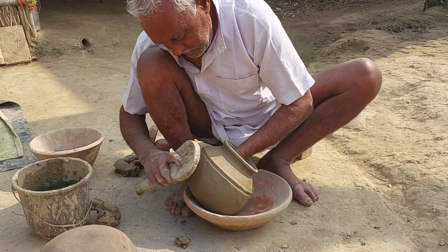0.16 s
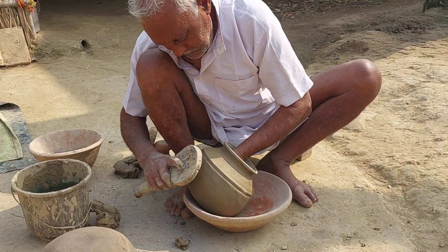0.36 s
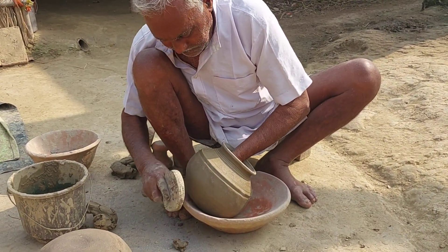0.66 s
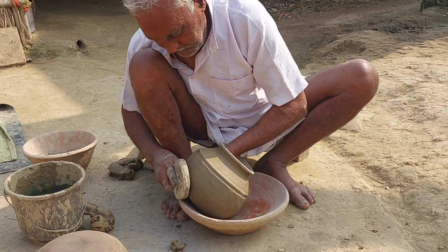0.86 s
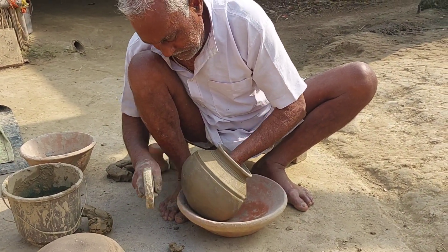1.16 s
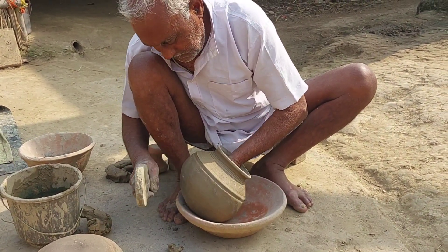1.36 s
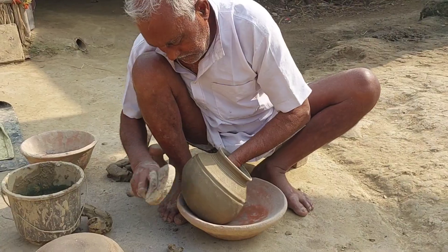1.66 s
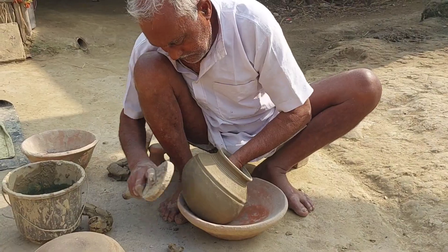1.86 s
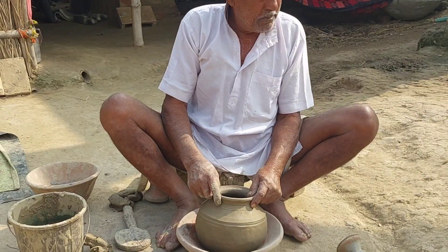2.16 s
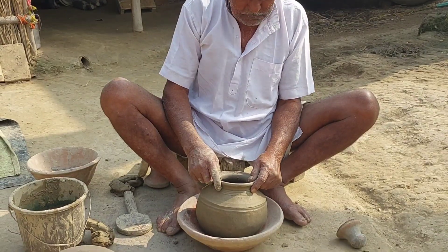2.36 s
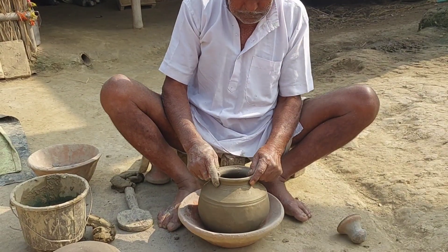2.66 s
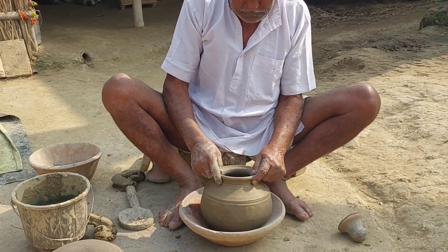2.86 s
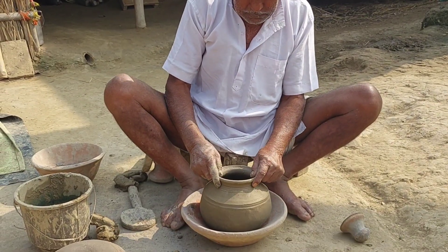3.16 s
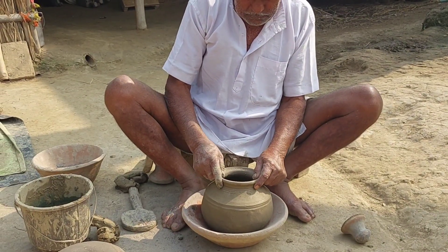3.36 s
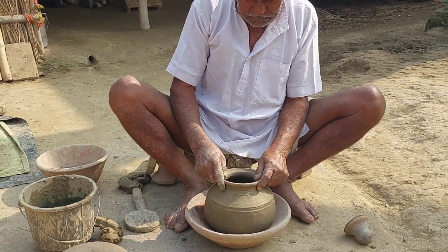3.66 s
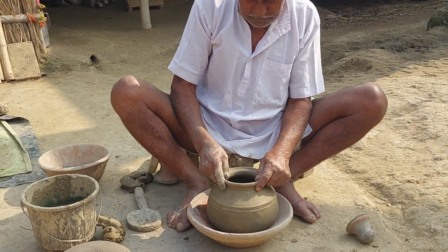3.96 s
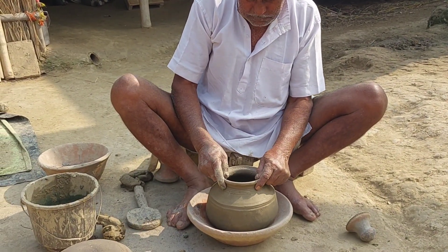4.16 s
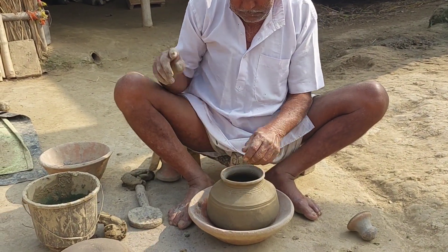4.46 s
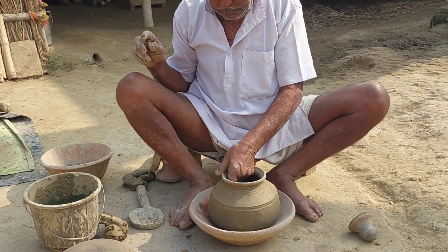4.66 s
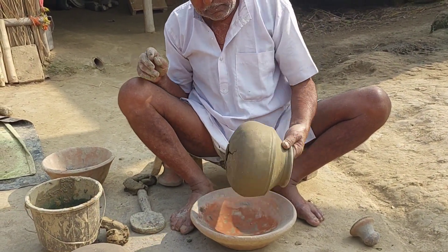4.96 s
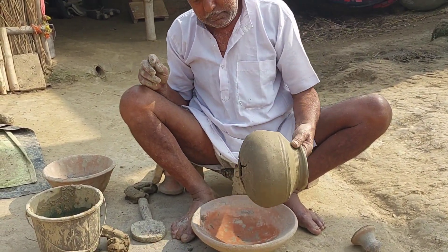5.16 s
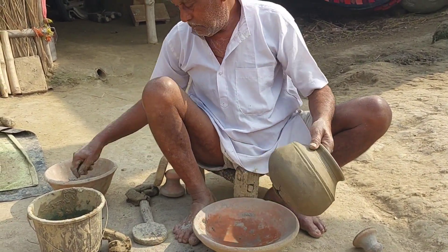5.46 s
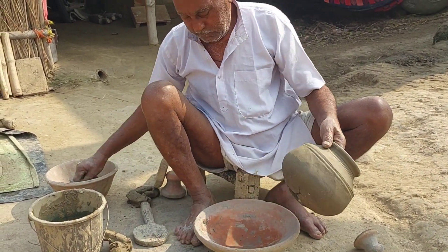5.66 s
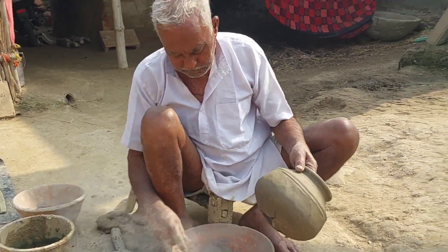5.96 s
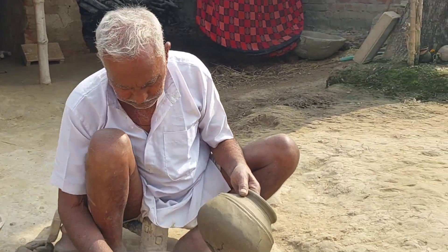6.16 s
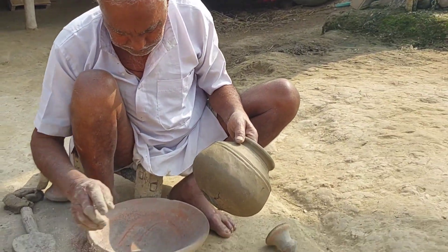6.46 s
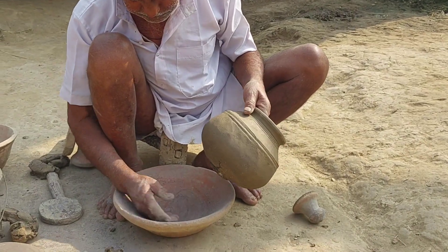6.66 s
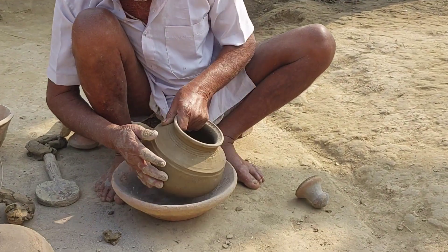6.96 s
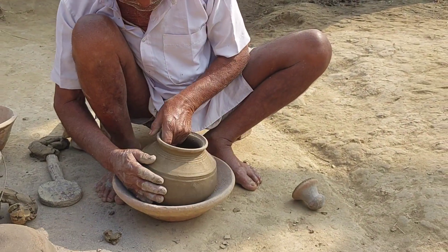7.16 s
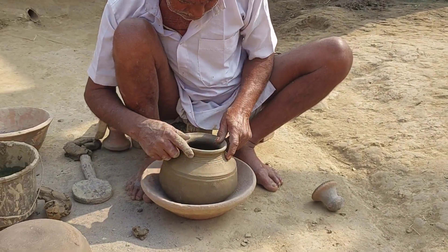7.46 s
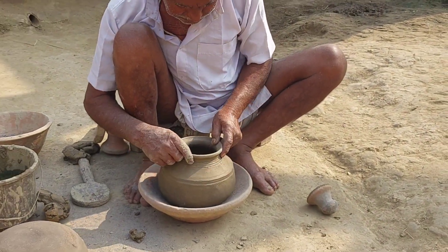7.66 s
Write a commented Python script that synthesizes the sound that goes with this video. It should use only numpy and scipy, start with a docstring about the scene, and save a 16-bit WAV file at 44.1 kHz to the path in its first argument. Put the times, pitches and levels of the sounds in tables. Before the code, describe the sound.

A wooden paddle beats a damp clay pot about five times a second, each blow a hollow thump with a sharp slap. Five blows come in the first 0.8 seconds, the last ones weakening; after a short pause, four louder ones follow from 1.2 to 1.8 seconds. From 2 to about 5 seconds it is much quieter: fingers give short gritty rubs and soft pats on the rim, while a very faint hum comes and goes. From 6 to 6.7 seconds a hand sweeps grit round a fired bowl, which rings lightly. At 7 seconds the pot slides into the bowl with a brief wavering squeal, then is dragged round with a grinding rumble, strongest at about 7.6 seconds. Light wind on the microphone, an airy rustle and faint distant chirps lie underneath. The place is an open earth yard, heard from a couple of metres away.

```python
"""An earth yard, a phone's two microphones a couple of metres from a squatting potter. Light wind, an
airy rustle and far chirps lie underneath. For two seconds a wooden paddle beats a damp clay pot, whose
soft wall and enclosed air thump together, with dull low tails. Then fingers work the rim, with soft
pats, while a faint hum comes and goes. At six seconds a hand sweeps grit round a fired bowl and makes
it ring; at seven the pot is set down in it with a squeal and dragged round."""
import sys
import numpy as np
from scipy import signal
from scipy.fft import rfft, irfft
from scipy.io import wavfile
from scipy.ndimage import uniform_filter1d

SR = 44100
rng = np.random.default_rng(int(sys.argv[2]) if len(sys.argv) > 2 else 0)


def master_out(mix):
    """Clip the mix to full scale and print it as 16-bit PCM to the path in sys.argv[1]."""
    frames = np.transpose(np.atleast_2d(mix))
    ceiling = np.clip(frames, -1, 1)
    pcm = np.round(ceiling * 32767).astype(np.int16)
    wavfile.write(sys.argv[1], SR, pcm)


N = 344421
T = np.arange(N) / SR

# wind on the microphones: (time [s], level [dB])
WIND_LEVELS = [(0.0, -58.5), (0.6, -68.5), (0.87, -54), (1.05, -76.5), (1.37, -58.5), (1.7, -63),
               (2.4, -62.5), (3.8, -64.5), (4.3, -62.5), (5.9, -64), (6.3, -59.5), (6.7, -63.5),
               (7.07, -58), (7.66, -47), (7.81, -57)]
# the background; the murmur's peaks are the dull tails of blows and ground bumps, and the pot's drag:
# (time [s], rustle level [dB], murmur level [dB])
BACKGROUND_LEVELS = [(0.0, -66, -48.5), (0.15, -68.5, -73.5), (0.95, -71, -72.5), (1.13, -74.5, -80.5),
                     (1.3, -67.5, -56), (1.39, -74, -89), (1.47, -68, -62.5), (1.6, -73.5, -69),
                     (1.82, -61, -59.5), (1.98, -70.5, -70), (2.8, -67, -72.5), (3.35, -69.5, -68),
                     (4.3, -64, -71), (5.0, -67, -71), (5.9, -69.5, -72.5), (6.15, -58.5, -63.5),
                     (6.45, -70.5, -73), (6.96, -72, -71.5), (7.25, -67, -53), (7.81, -72, -65.5)]
# spectra of the wind and the background: (frequency [Hz], relative density [dB])
WIND_SPECTRUM = [(12, -44), (20, -16.5), (70, -0.5), (85, -1), (102, -9.5), (129, -8.5), (170, -18.5),
                 (220, -45.5), (370, -120)]
MURMUR_SPECTRUM = [(82, -35), (140, -9.5), (178, -7), (303, 0), (464, -11), (615, -11.5), (900, -27.5),
                   (1170, -58), (1980, -120)]
RUSTLE_SPECTRUM = [(410, -36), (700, -6), (1110, -7.5), (1330, -5), (1640, -5.5), (2090, -1), (3210, -3),
                   (3680, -0.5), (4680, -5), (6970, -5.5), (8600, -16), (11200, -54), (18900, -120)]
SIZZLE_SPECTRUM = [(5060, -35.5), (8600, -6.5), (11600, 0), (12600, -0.5), (13800, -3.5), (15200, -4.5),
                   (16000, -9)]

# paddle blows; thud to crack top count from the thump, before the boosts in paddle():
# (time [s], thump peak [dB], pitch [Hz], thud [dB], wall ring [dB], slap [dB], slap colour [Hz],
# crack [dB], crack top [dB], left minus right [dB], after-ring [dB re thump])
BLOW_HITS = [(0.004, -25.5, 295, -41, -29, -31, 2420, -43, -49, 2, -5),
             (0.202, -15, 307.7, -24.5, -42.5, -21.5, 1970, -27, -46.5, 1.5, -18),
             (0.383, -21, 306.4, -29.5, -42.5, -16, 2200, -28.5, -45, 1, -14),
             (0.571, -24.5, 300.6, -33, -44, -32.5, 1520, -38, -57, 3.5, -16.5),
             (0.752, -38, 287, -44, -48, -44, 2310, -31, -36, 1.0, -6),
             (1.244, -15, 309, -29.5, -41, -26, 1900, -25.5, -35.5, -2, -24),
             (1.41, -10.5, 307.8, -18.5, -27, -25.5, 1490, -21, -32.5, -1, -18),
             (1.601, -14.5, 316, -15, -34, -11, 2870, -17.5, -31, 2, -24.5),
             (1.792, -16, 313, -18, -36.5, -16.5, 2670, -24.5, -33, 2, -24.5)]
# the pot's air and soft wall, coupled: (pitch ratio, relative level [dB], t60 [s], signed weight)
HOLLOW_MODES = [(.935, 3, 0.045, 0.88), (1.11, 2.5, 0.039, -1.09), (0.83, -21, .16, -1.02),
                (1.26, -13.5, .13, 0.79), (0.38, -25.5, 0.14, -0.035), (0.8, -27, 0.036, 0.87),
                (1.9, -22.5, 0.032, 0.82)]
# the air ringing on once the wall is still: (pitch ratio, relative level [dB], t60 [s])
AFTER_RING_MODES = [(1.0, -0.5, .17), (1.06, -10, .2)]
# modes of the clay wall and the wooden paddle: (frequency [Hz], relative level [dB], t60 [s])
WALL_MODES = [(732, -12.5, 0.12), (965, -15.5, 0.079), (1134, -2.5, 0.14), (1490, -7.5, 0.036)]
WOOD_MODES = [(1490, 0.5, .035), (1873, -8, 0.07), (2500, 0.5, 0.045), (2764, 2, 0.04)]
WALL_GIVE_T60_S, WALL_STILL_S = 0.0057, 0.018
YARD_T60_S, YARD_GAP_S = 0.17, 0.016

# far chirps: (time [s], length [s], start pitch [Hz], end pitch [Hz], gain [dB])
FAR_CHIRPS = [(0.029, 0.043, 2084, 2315, -56.5), (0.304, 0.094, 1790, 1710, -62),
              (0.462, 0.03, 1950, 1900, -62), (0.508, 0.052, 3215, 3140, -57),
              (0.543, 0.067, 1955, 1810, -62), (0.597, 0.22, 2330, 2324, -72),
              (0.633, .38, 1425, 1357, -75), (0.773, 0.055, 1845, 2055, -64.5),
              (1.521, 0.19, 846, 860, -63), (2.516, 0.05, 3400, 4840, -66), (2.572, .07, 4570, 3690, -65),
              (2.82, 0.039, 2900, 2900, -62), (3.395, .04, 4790, 6730, -62.5),
              (3.759, 0.059, 3900, 7120, -56.5), (3.936, 0.057, 3900, 6780, -58.5),
              (4.258, 0.082, 3680, 4760, -58.5), (4.916, 0.067, 4880, 4200, -65),
              (5.413, 0.059, 4900, 3910, -65), (7.143, 0.044, 5660, 6930, -62.5),
              (7.27, 0.08, 4950, 4500, -62)]
# weight shifting on the ground: (time [s], peak [dB], pitch [Hz], left minus right [dB])
GROUND_BUMPS = [(0.145, -48.5, 73, 2), (0.3, -53.5, 91, 22), (0.62, -42, 64, 4), (0.869, -54, 77, 25),
                (0.918, -49.5, 68.6, -18), (1.279, -36.5, 120, 5.5), (1.309, -39.5, 70.0, 12),
                (1.337, -37, 94.2, 6), (1.696, -44.5, 99, 12), (1.709, -41, 68.6, -4),
                (6.984, -45.5, 72, -21)]
# fingers on the damp rim, before the trims in fingers(): (time [s], peak [dB], colour [Hz], t60 [s],
# knock [dB re peak], tick [dB re peak], left minus right [dB])
RIM_TOUCHES = [(0.5983, -50, 2470, 0.15, 1, -27, 4), (0.782, -58.5, 1880, 0.071, 10.5, -16, -4),
               (0.9818, -50.5, 2070, 0.11, -34, -24, -1), (1.939, -52.5, 6070, 0.32, -15, -14, 5),
               (2.1286, -56, 2110, 0.31, -4, -20, 2), (2.269, -47, 6100, 0.25, -17, -19, 4.5),
               (2.2987, -60, 6690, 0.087, -4, -8, 3.5), (2.597, -47, 4600, 0.093, -14.5, -24, 4),
               (2.6736, -55.5, 2100, 0.19, -12, -20, 0), (2.778, -50.5, 2400, 0.22, -33, -27, -1),
               (2.8968, -46, 3800, 0.17, -14, -19, 4), (3.017, -43.5, 2500, 0.059, -20, -36, 4),
               (3.264, -42, 1980, 0.12, -10.5, -27, 2), (3.289, -49, 4520, 0.19, -8, -17, 5),
               (3.4287, -47.5, 1840, 0.08, -31, -30, 1), (3.5876, -45.5, 4000, 0.095, -1.5, -23, 4.5),
               (3.6143, -42, 4300, 0.24, -15, -17.5, 2), (3.8643, -55, 1740, 0.047, -15, -21, -4),
               (4.0314, -46, 2330, 0.11, -11, -23, -1), (4.1578, -47.5, 2460, 0.034, -16, -10, 4),
               (4.2752, -52.5, 4200, 0.058, -10, -9, 14), (4.361, -38, 3380, 0.087, -5, -25, 5),
               (4.446, -39.5, 2500, 0.041, -22, -24, 5), (4.6638, -44, 3460, 0.071, 4.5, -25, 4.5),
               (5.0883, -57, 3320, 0.087, -9, -11, 8), (5.246, -49.5, 2810, 0.41, -21, -17, 2),
               (5.9512, -47.5, 5700, 0.049, -28, -10, 7), (6.0804, -47.5, 2360, 0.058, -5.5, 1.5, 5),
               (6.6677, -57, 3780, 0.08, -15.5, -3, 2), (7.341, -49.5, 2300, 0.21, -19, -20, -8),
               (7.475, -60, 1500, 0.08, -5, -26, 2)]
# spells of a faint tone: (start [s], end [s], level [dB])
HUM_SPELLS = [(2.41, 2.57, -78), (2.9, 3.395, -79.5), (4.13, 4.204, -79.5), (4.302, 4.447, -80),
              (4.659, 4.904, -83.5), (5.21, 5.292, -81), (6.372, 6.42, -82)]
HUM_HZ, HUM_FADE_DB_PER_S = 620, 166
# soft pats on the pot: (time [s], peak [dB], pitch [Hz])
SOFT_PATS = [(2.644, -58, 303), (3.282, -51, 288), (3.34, -52, 290), (3.448, -54.5, 306), (3.495, -55, 283),
             (3.808, -55.5, 310), (4.137, -50.5, 295), (4.356, -55, 302)]

# the palm going through grit: (start [s], end [s], start level [dB], end level [dB],
# sizzle [dB re level], drive to the bowl [dB re level], crackle [dB re level])
PALM_STROKES = [(5.958, 5.967, -48.5, -52.5, -14, -22, -30), (6.012, 6.057, -66, -69.5, -13, -1, 13.5),
                (6.08, 6.223, -65.5, -62.5, 6, -6, -4), (6.24, 6.398, -54.5, -45.5, -1, -16.5, -29),
                (6.588, 6.62, -57, -63, -4.5, -16, -22), (6.655, 6.716, -59.5, -48, -2.5, -14, -19.5)]
PALM_LANDS_DB_PER_S, PALM_LIFTS_DB_PER_S = 1502, 1100
# knocks on the bowl as the palm lands and lifts: (time [s], drive to the bowl [dB])
BOWL_KNOCKS = [(6.093, -63), (6.382, -50), (6.7, -68)]
CLINK_S, CLINK_FADE_DB_PER_S = 0.012, 900
# modes of the fired bowl: (frequency [Hz], relative level [dB], t60 [s])
BOWL_MODES = [(1500, 3.5, 0.073), (1750, -1, 0.085), (2360, 10.5, 0.075), (3900, -1.5, 0.061),
              (5200, -23, 0.055), (6100, -26, .05)]

# partials of the foot's squeal: (frequency [Hz], waver [Hz], onset [s], level [dB], fade [dB/s])
SQUEAL_PARTIALS = [(1528, 33.3, 7.02, -48.5, 112), (1960, 37.7, 7.04, -45.5, 177),
                   (3010, 35, 7.04, -50, 380), (4075, 20, 7.05, -41, 231), (6360, 42, 7.045, -54, 250),
                   (12100, 60, 7.075, -61, 600)]
# shoves of the pot round the bowl: (start [s], end [s], rumble at start [dB], rumble at end [dB],
# grind [dB re rumble], grit [dB re rumble])
POT_SHOVES = [(7.039, 7.132, -60, -62, 8.5, 0), (7.174, 7.41, -51.5, -64.5, -8, -38),
              (7.333, 7.358, -70.5, -71, -2, 8), (7.43, 7.53, -61, -53.5, -7.5, -22),
              (7.561, 7.671, -30.5, -40, 2.5, -1.5), (7.676, 7.81, -34.5, -48.5, -2.5, -14.5)]
GRIND_FOLLOWS, GRIT_FOLLOWS = 0.67, 2.8  # extra dB lost for each dB that a shove slackens
# grit under the pot: (frequency [Hz], relative density [dB])
GRIT_SPECTRUM = [(1760, -38), (3000, -15), (4900, 5), (5400, 3), (7150, 8), (9010, -4.5), (12800, -8),
                 (16000, -11)]

MIC_DIP_BAND_HZ, MIC_TOP_HZ = (7505, 9805), 15800


def undb(db):
    return 10 ** (np.asarray(db) / 20)


def unit(x):
    return x / np.sqrt(np.mean(x ** 2))


def peak(x, db):
    return x * undb(db) / np.abs(x).max()


def curves(table):
    """A table's level columns joined in time; silent outside it."""
    times, *columns = np.transpose(table)
    return [np.interp(T, times, db, left=-200, right=-200) for db in columns]


def stroke(start, end, start_db, end_db, rise, fall):
    """Level in dB: rises to the start, runs straight to the end, then falls (slopes in dB/s)."""
    held = np.interp(T, [start, max(end, start + 1e-4)], [start_db, end_db])
    return np.maximum(held - rise * np.maximum(start - T, 0) - fall * np.maximum(T - end, 0), -200)


def band(x, lo_hz, hi_hz):
    sos = signal.butter(2, [lo_hz, min(hi_hz, .45 * SR)], "bandpass", fs=SR, output="sos")
    return signal.sosfilt(sos, x)


def ring(x, hz, t60):
    """One decaying mode; a unit click rings with height 1."""
    pole = np.exp((2j * np.pi * hz - np.log(1000) / t60) / SR)
    return signal.lfilter([1], [1, -pole], x).imag


def white():
    return rng.standard_normal(N)


def walk(per_s):
    """Random levels, held and slewed; spread near 1."""
    hold = int(SR / per_s)
    steps = np.repeat(rng.standard_normal(N // hold + 1), hold)
    return 1.4 * uniform_filter1d(uniform_filter1d(steps, hold), hold)[:N]


def grains(scatter_db, per_s):
    """Noise whose tiny pieces differ in size, rms 1."""
    hold = max(int(SR / per_s), 1)
    return unit(white() * np.repeat(undb(scatter_db * rng.exponential(size=N // hold + 1)), hold)[:N])


def colour(x, spectrum):
    """Shape x to a spectrum, rms 1."""
    hz, db = np.transpose(spectrum)
    bins_hz = np.maximum(np.fft.rfftfreq(N, 1 / SR), 1)
    return unit(irfft(rfft(x) * undb(np.interp(np.log(bins_hz), np.log(hz), db)), N))


def pan(x, pan_db):
    return x * undb(np.array([[pan_db], [-pan_db]]) / 2)


def mics(make, alike, lag_s=0., pan_db=0.):
    """Two microphones: a shared part that reaches the left lag_s later, plus a part of their own."""
    shared = make()
    pair = np.array([np.roll(shared, int(lag_s * SR)), shared])
    return pan(np.sqrt(alike) * pair + np.sqrt(1 - alike) * np.array([make(), make()]), pan_db)


def add(out, s, sound, pan_db=0):
    start = int(s * SR)
    n = min(sound.shape[-1], N - start)
    out[:, start:start + n] += pan(sound[..., :n], pan_db)


def wind():
    """Light wind buffets the microphones with an uneven rumble."""
    gusts = mics(lambda: colour(white(), WIND_SPECTRUM), 0.55, .0002, 3.5) * undb(3.9 * walk(22))
    return gusts * undb(curves(WIND_LEVELS)[0])


def background():
    """A low murmur, swelling with the tails of blows and bumps and the drag; a rustle, a thin sizzle."""
    rustle_db, murmur_db = curves(BACKGROUND_LEVELS)
    murmur = mics(lambda: colour(white(), MURMUR_SPECTRUM), 0.67, .0001, -1.8) * undb(2 * walk(14))
    rustle = mics(lambda: colour(grains(2.1, 400), RUSTLE_SPECTRUM), 0.55, .00045, 1.6)
    rustle *= undb(2.4 * walk(12))
    sizzle = mics(lambda: colour(grains(1.5, 400), SIZZLE_SPECTRUM), .08, .00045, 3.2)
    sizzle *= undb(0.68 * walk(25))
    return undb(murmur_db) * murmur + undb(rustle_db) * (rustle + undb(-9.5) * sizzle)


def hollow(hz, db, ring_db):
    """The wall gives, then beats against the pot's air: a quickly cancelled thump, a weak after-ring."""
    t = T[:int(.3 * SR)]
    give = ring(t == 0, hz, WALL_GIVE_T60_S)
    thump = sum(weight * undb(g) * ring(give, hz * ratio, t60) for ratio, g, t60, weight in HOLLOW_MODES)
    after = sum(undb(g) * ring(give, hz * ratio, t60) for ratio, g, t60 in AFTER_RING_MODES)
    after *= np.minimum(t / WALL_STILL_S, 1) ** 2
    return peak(thump, db) + peak(after, db + ring_db)


def paddle():
    """Wood on damp clay, as (thumps, smacks): a smack is a thud, ringing wall and wood, slap and crack."""
    thumps, smacks, t = np.zeros((2, N)), np.zeros((2, N)), T[:int(.3 * SR)]
    click = 1. * (t == 0)
    for s, db, hz, thud_db, wall_db, slap_db, slap_hz, crack_db, top_db, pan_db, ring_db in BLOW_HITS:
        add(thumps, s, hollow(hz, db, ring_db))
        noise = rng.standard_normal((3, len(t)))  # shared, left, right
        thud = band(noise[0] * np.exp(-t / 0.0058), 290, 1464)
        wall = sum(undb(g + rng.normal(0, 1.1)) * ring(click, f, t60) for f, g, t60 in WALL_MODES)
        wood = sum(undb(g) * ring(click, f, t60) for f, g, t60 in WOOD_MODES)
        wood = band(wood, slap_hz / 1.12, slap_hz * 1.137)  # where the face lands picks the modes
        burst = (noise[0] + .5 * noise[1:]) * np.exp(-t / 0.0051)
        slap = band(burst, slap_hz / 1.8, min(slap_hz * 1.3, 3000))
        slap = band(slap, 820, 2700)  # wet clay swallows the upper part
        body = peak(thud, thud_db + 4.5) + peak(wall, wall_db + 9.5)
        body = body + peak(slap, slap_db) + peak(wood, slap_db)
        snap_decay = np.exp(-t / 0.0013) + undb(-19) * np.exp(-t / 0.0061)
        snap = (noise[0] + 1.6 * noise[1:]) * np.minimum(t / 0.0012, 1) * snap_decay
        crack = peak(band(band(snap, 5300, 7700), 4300, 8600), crack_db + 8.5)
        crack_top = peak(band(snap, 9600, 15500), top_db + 14)
        add(smacks, s, (body + crack + crack_top) * undb(db), pan_db)
    return thumps, smacks


def yard_echo(sound, alike):
    """A scattered tail; nothing returns until the sound has been to the nearest wall and back."""
    t = T[:int(.3 * SR)]
    tail = np.exp(-np.log(1000) * t / YARD_T60_S) * (t > YARD_GAP_S)
    scatter = mics(white, alike)[:, :len(t)] * tail / np.sqrt(np.sum(tail ** 2))
    return signal.fftconvolve(sound, scatter, axes=1)[:, :N]


def chirps():
    """Whistles far off; the wider the glide, the more the air smears it."""
    out = np.zeros((2, N))
    for s, length, from_hz, to_hz, db in FAR_CHIRPS:
        progress = np.linspace(0, 1, int(length * SR))
        blur_hz = 120 + 0.13 * abs(to_hz - from_hz)
        blur = uniform_filter1d(rng.standard_normal((2, len(progress))), int(SR / blur_hz), axis=1)
        phase = 2 * np.pi * np.cumsum(from_hz + (to_hz - from_hz) * progress) / SR
        add(out, s, undb(db) * unit(blur) * np.sin(np.pi * progress) ** .5 * np.sin(phase))
    return out


def bumps():
    """Weight shifts on the earth: low pulses that die almost at once."""
    out, t = np.zeros((2, N)), T[:int(.1 * SR)]
    for s, db, hz, pan_db in GROUND_BUMPS:
        add(out, s, peak(np.sin(2 * np.pi * hz * t) * t * np.exp(-t / 0.0046), db), pan_db)
    return out


def fingers():
    """Each touch on the rim: a short gritty rub, a dull knock of the pot, a thin tick of dry crumbs."""
    out, t = np.zeros((2, N)), T[:int(.2 * SR)]
    for s, db, hz, t60, knock_db, tick_db, pan_db in RIM_TOUCHES:
        noise = rng.standard_normal((3, len(t)))  # shared, left, right
        crumbs = np.repeat(undb(2.8 * rng.standard_normal(len(t) // 90 + 1)), 90)[:len(t)]
        decay = np.exp(-np.log(1000) * t / t60) + 1.07 * np.exp(-t / 0.00098)
        friction = (noise[0] + 1.17 * noise[1:]) * crumbs * np.minimum(t / 0.0004, 1) * decay
        rub = peak(band(friction, hz / 1.35, hz * 1.34), db - 0.5)
        knock = peak(band(noise[0] * np.exp(-t / 0.012), 105, 435), db + knock_db - 0.5)
        tick = peak(band(friction, 10900, 15000), db + tick_db + 8.5)
        add(out, s, rub + knock, pan_db)
        add(out, s, tick, pan_db + 5.5)
    return out


def hum():
    """A faint, wavering tone comes and goes in the centre."""
    spells = sum(undb(stroke(start, end, db, db, HUM_FADE_DB_PER_S, HUM_FADE_DB_PER_S))
                 for start, end, db in HUM_SPELLS)
    phase = 2 * np.pi * np.cumsum(HUM_HZ + 5 * walk(14)) / SR
    return np.sqrt(2) * np.sin(phase) * spells * undb(3 * walk(14))


def pats():
    """Soft pats wake only the hollow of the pot."""
    out = np.zeros((2, N))
    for s, db, hz in SOFT_PATS:
        add(out, s, hollow(hz, db, ring_db=-10))
    return out


def sweeps():
    """Grit under the palm: fine grains ring the fired bowl, which the palm also knocks as it lands and lifts;
    coarser grains crackle low."""
    grit = mics(lambda: grains(2.1, 2500), 0.23, -0.00014, -1.6)
    scrape = unit(band(grit, 2070, 6330))
    sizzle = unit(band(mics(lambda: grains(2.6, 2500), 0.078), 11050, 16000))
    crackle = unit(mics(lambda: band(grains(4.5, 640), 270, 3270), 0.16))
    press = undb(2 * walk(45))  # the palm presses unevenly
    drive = sum(undb(stroke(s, s + CLINK_S, db, db, PALM_LANDS_DB_PER_S, CLINK_FADE_DB_PER_S))
                for s, db in BOWL_KNOCKS)
    out = np.zeros((2, N))
    for start, end, start_db, end_db, sizzle_db, drive_db, crackle_db in PALM_STROKES:
        gain = undb(stroke(start, end, start_db, end_db, PALM_LANDS_DB_PER_S, PALM_LIFTS_DB_PER_S))
        drive += gain * undb(drive_db)
        out += gain * press * (scrape + undb(sizzle_db) * sizzle + undb(crackle_db) * crackle)
    return out + sum(undb(db - 26.5) * ring(grit * drive, hz, t60) for hz, db, t60 in BOWL_MODES)


def squeal():
    """The pot's foot slides into the bowl: a wavering squeal of clay on clay."""
    out = np.zeros((2, N))
    for hz, waver_hz, s, db, fade in SQUEAL_PARTIALS:
        cycles = np.cumsum(hz + waver_hz * walk(220)) / SR + [[0], [.2]]  # the right mic leads
        level_db = stroke(s, s, db, db, rise=1299, fall=fade)
        flicker_db = 3.8 * np.array([walk(260), walk(260)])
        out += undb(level_db + flicker_db) * np.sin(2 * np.pi * cycles)
    return out


def drag():
    """The pot rumbles round the bowl; grind and grit drop away first as a shove slackens."""
    rumble = unit(mics(lambda: band(grains(1.84, 900), 90, 570), 0.83, -0.00027))
    grind = unit(mics(lambda: band(grains(1.8, 900), 970, 2700), 0.12, -0.00017, -1.2))
    grit = mics(lambda: colour(grains(0.92, 1500), GRIT_SPECTRUM), 0.23, -0.00088)
    out = np.zeros((2, N))
    for start, end, start_db, end_db, grind_db, grit_db in POT_SHOVES:
        db = stroke(start, end, start_db, end_db, rise=1100, fall=400)
        slack_db = db - max(start_db, end_db)
        grind_gain = undb(grind_db + GRIND_FOLLOWS * slack_db)
        grit_gain = undb(grit_db + GRIT_FOLLOWS * slack_db)
        out += undb(db) * (rumble + grind_gain * grind + grit_gain * grit)
    return out


def scene():
    """All that reaches the phone; the yard sends back the blows, pats and chirps."""
    far = chirps()
    thumps, smacks = paddle()
    thumps += pats()
    beating = thumps + smacks + yard_echo(thumps * undb(-17.5) + smacks * undb(-20.5), alike=0.24)
    potter = beating + bumps() + fingers() + sweeps() + squeal() + drag()
    return potter + far + yard_echo(far * undb(-4), alike=.2) + wind() + background() + hum()


def record(dry):
    """The phone's microphones have a dip in the upper treble; the top is cut."""
    dipped = dry - 0.34 * band(dry, *MIC_DIP_BAND_HZ)
    return signal.sosfilt(signal.ellip(10, .2, 80, MIC_TOP_HZ, fs=SR, output="sos"), dipped)


dry = scene()
out = record(dry)
master_out(out)
```